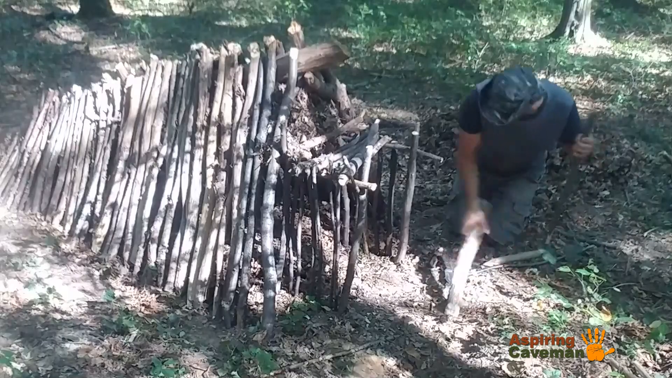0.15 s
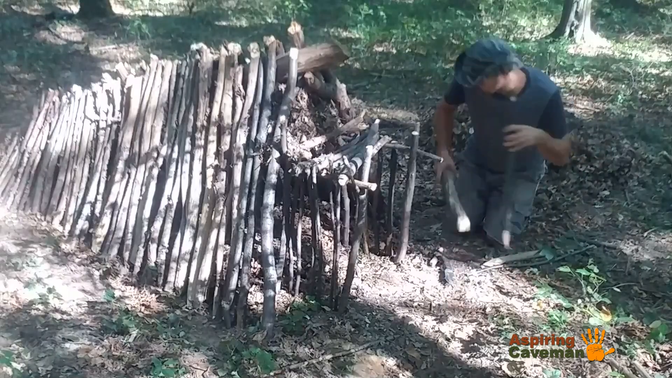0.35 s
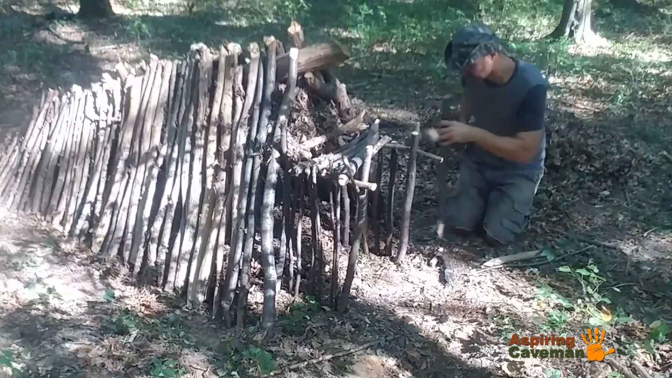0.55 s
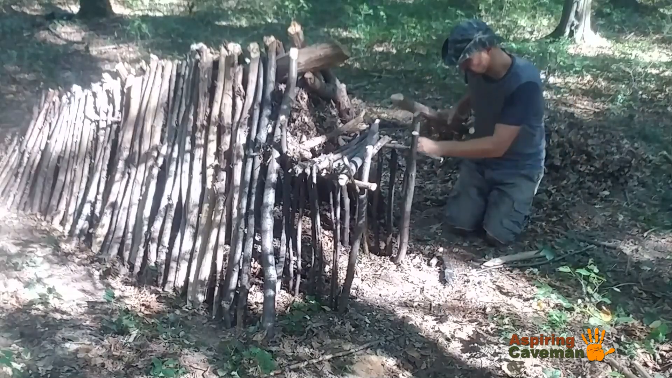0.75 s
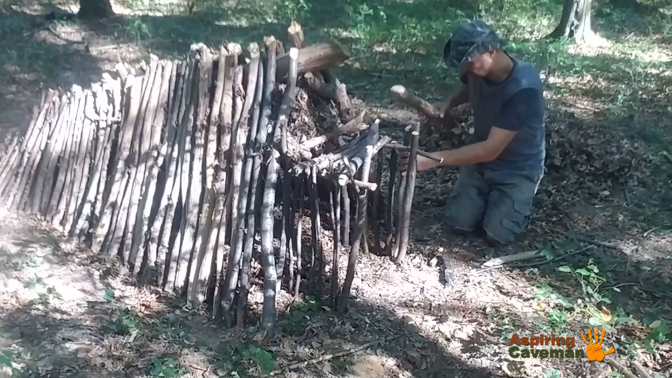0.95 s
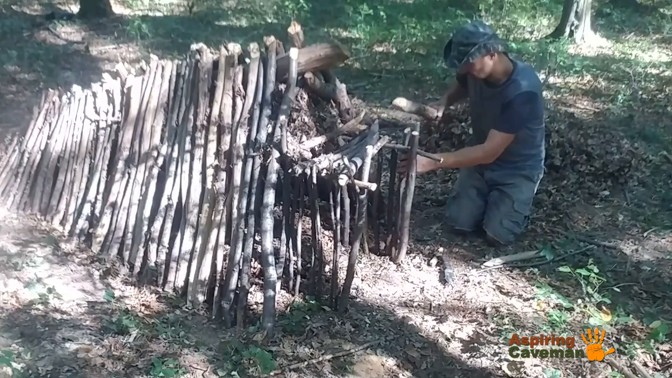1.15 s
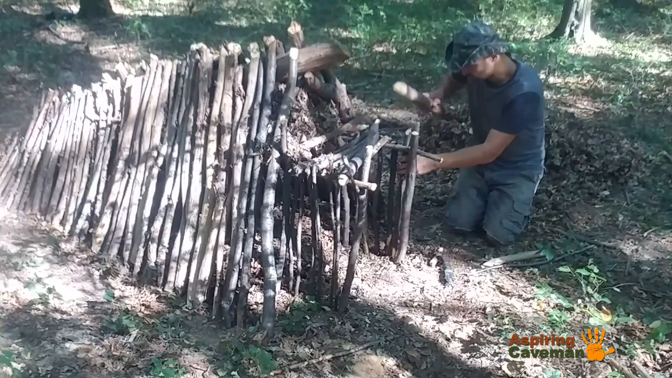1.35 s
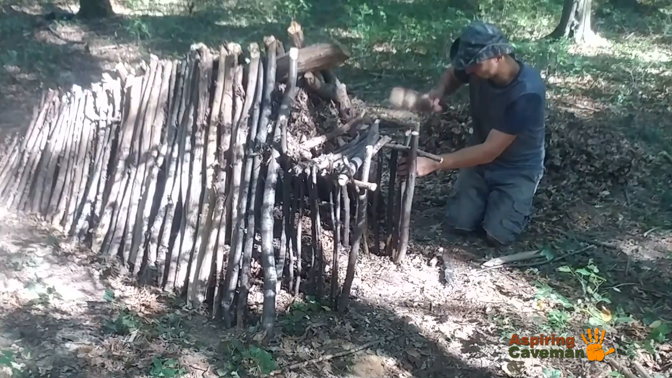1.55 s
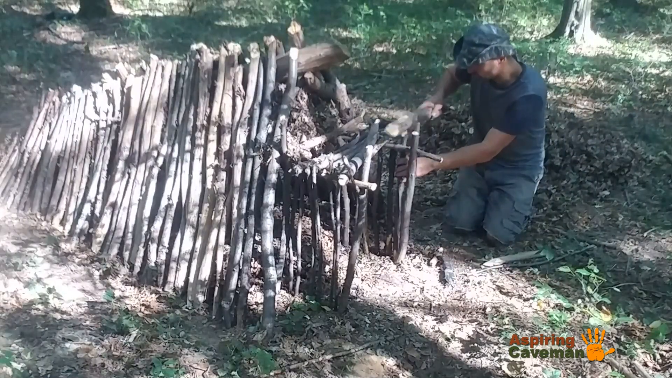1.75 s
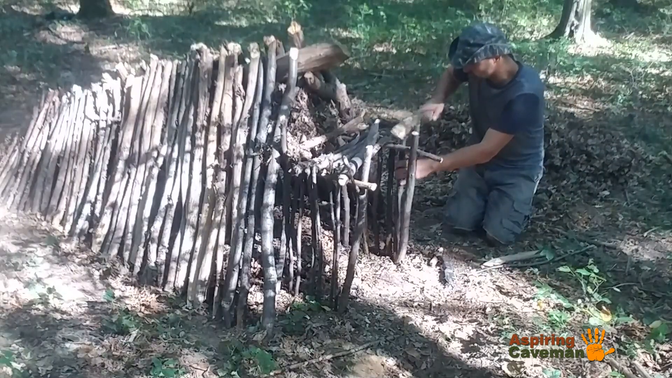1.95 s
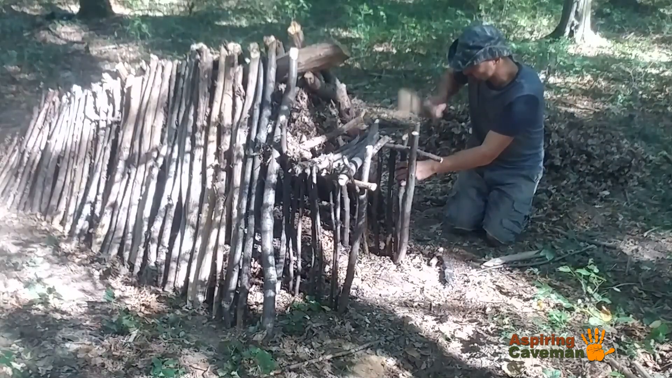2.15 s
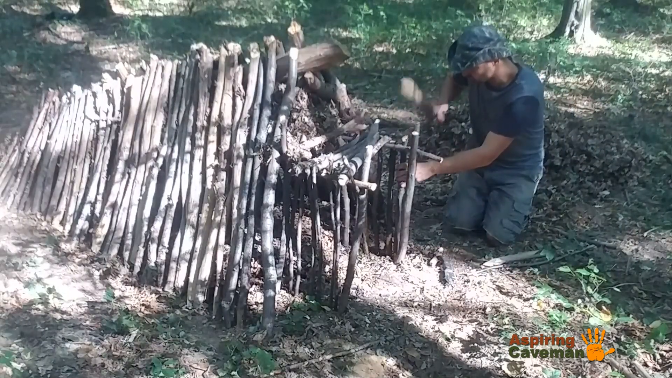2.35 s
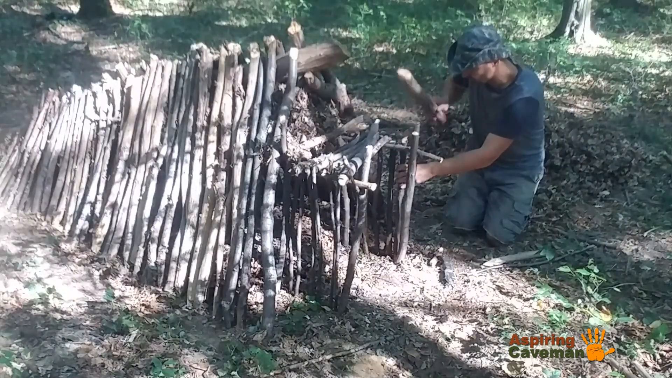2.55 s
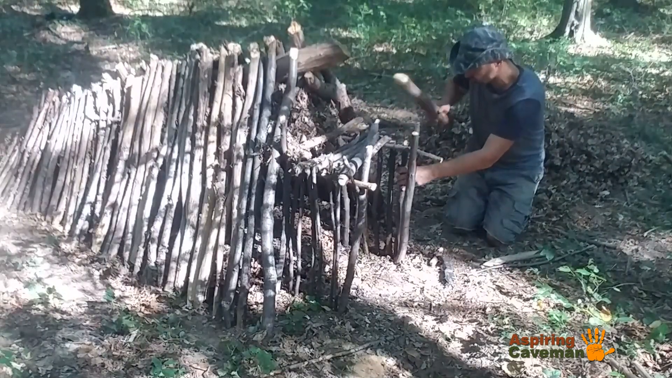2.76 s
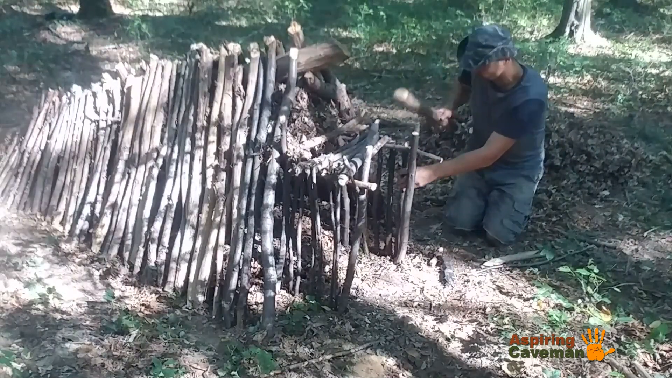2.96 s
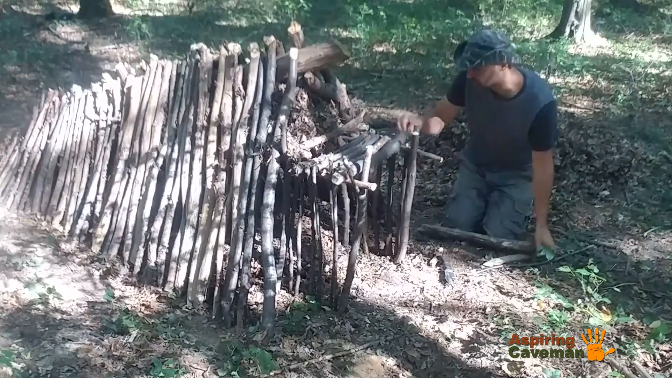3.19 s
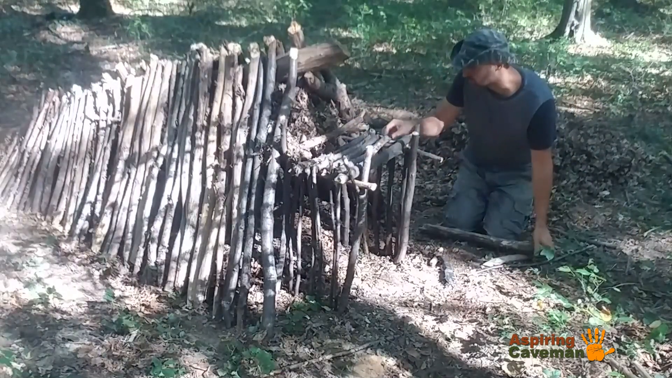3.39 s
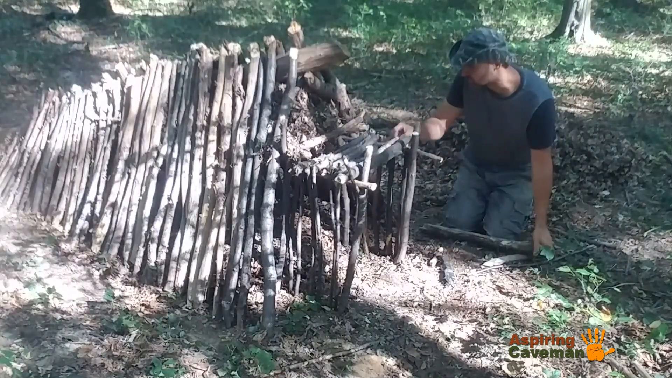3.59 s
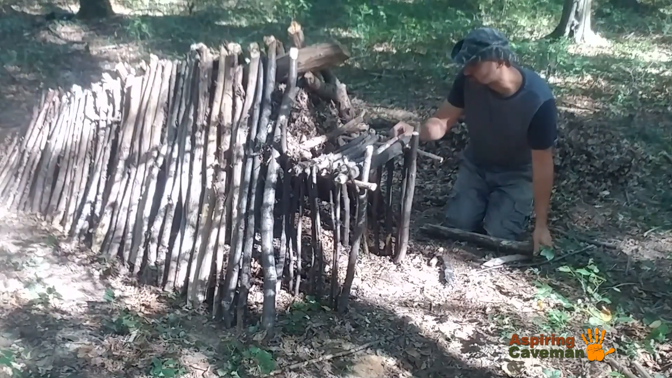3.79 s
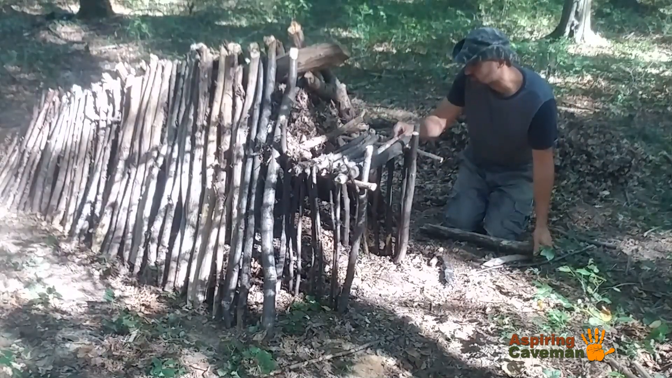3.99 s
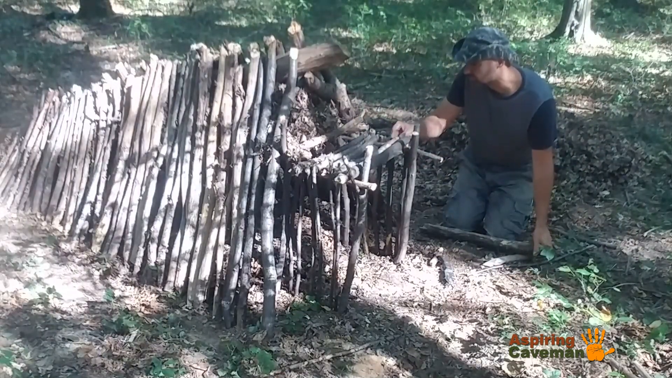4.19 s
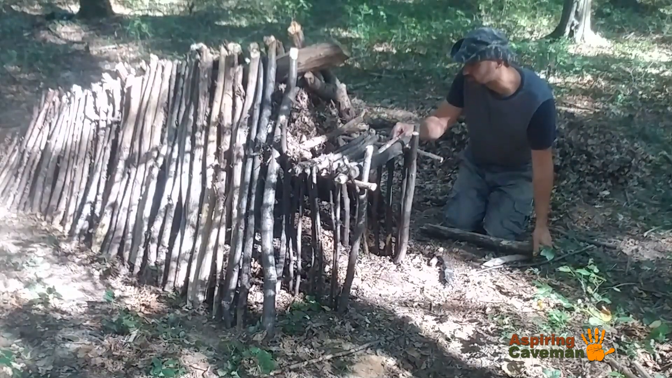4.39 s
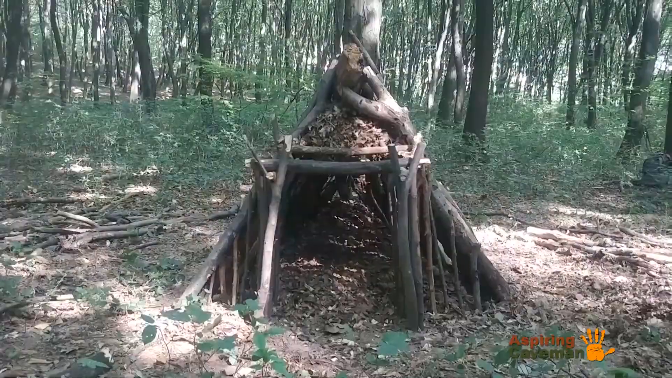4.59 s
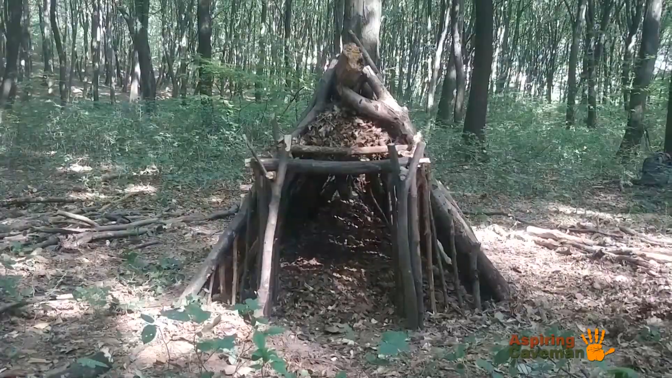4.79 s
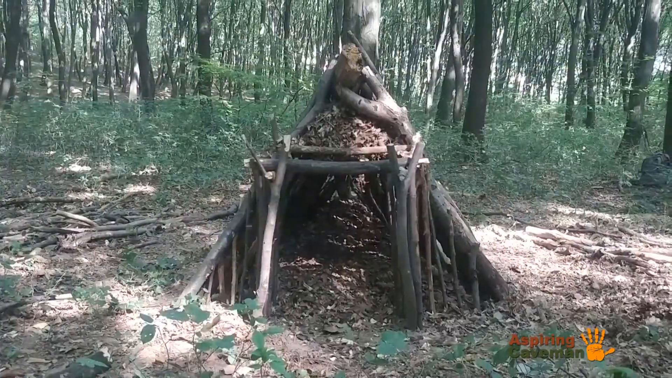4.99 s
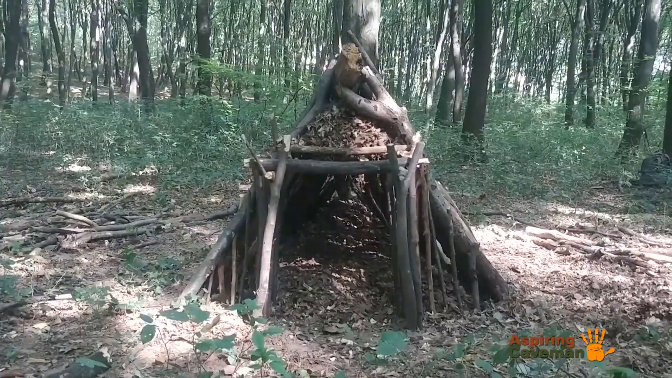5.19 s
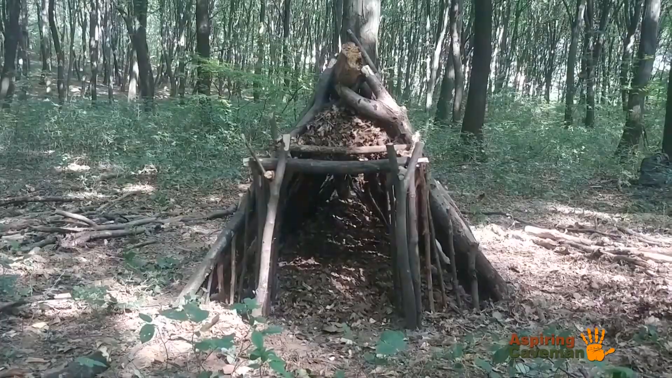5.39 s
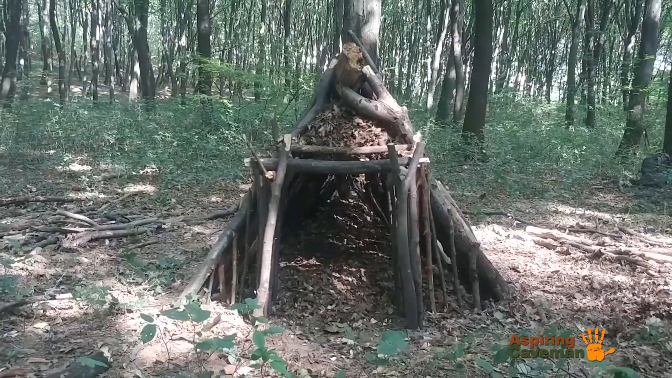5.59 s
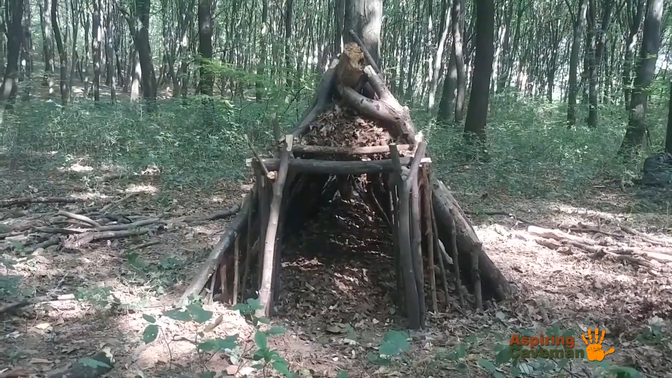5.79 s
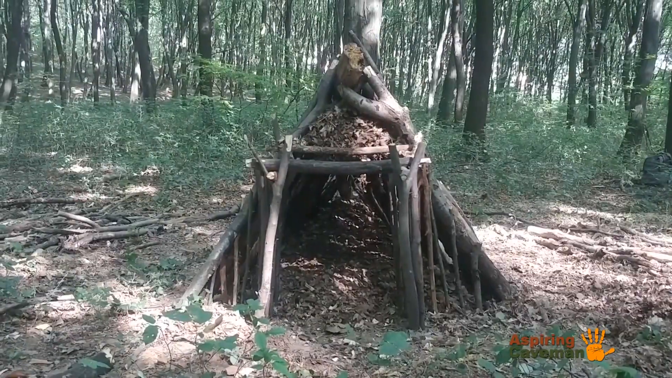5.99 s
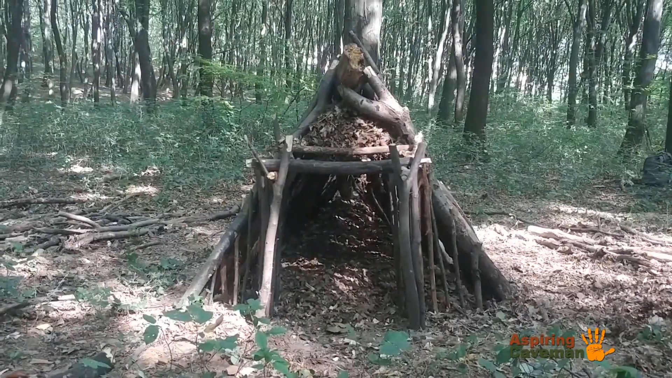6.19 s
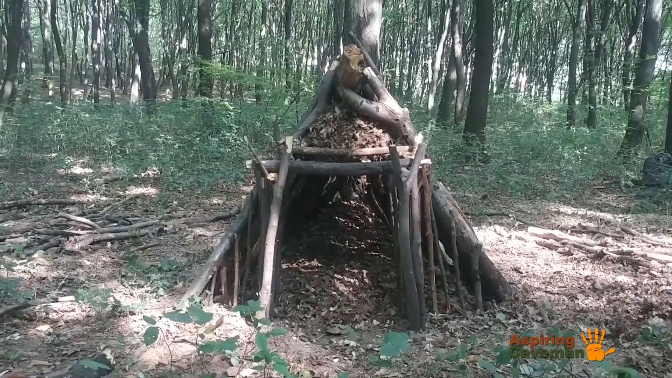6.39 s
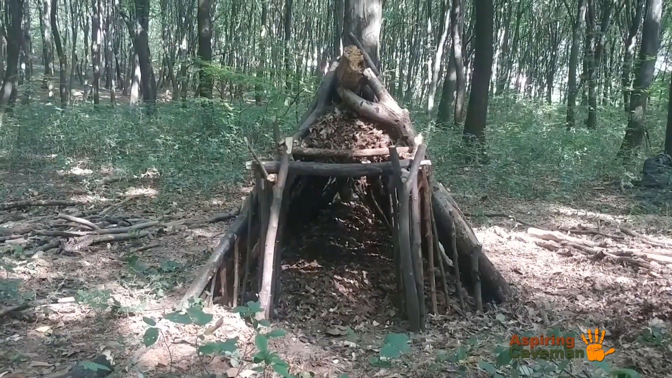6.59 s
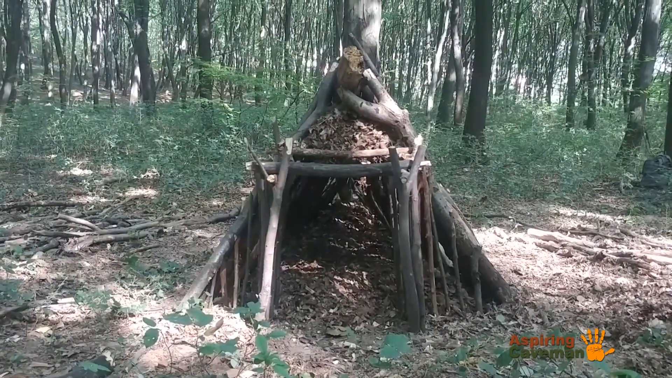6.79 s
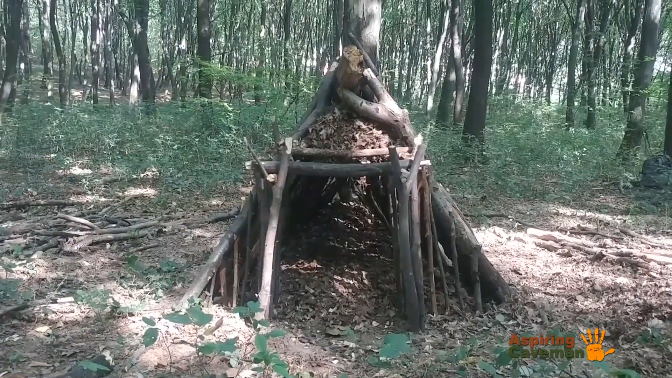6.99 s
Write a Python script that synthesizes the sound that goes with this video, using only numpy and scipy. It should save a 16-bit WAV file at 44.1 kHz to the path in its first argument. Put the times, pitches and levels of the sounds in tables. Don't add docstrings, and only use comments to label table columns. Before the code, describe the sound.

In an open forest, a short log taps a wooden stake seven times in quick, uneven blows, first very light, then firm, dry and clacking, with short echoes off trunks. Songbirds whistle, trill and chatter to the right over a faint road drone. The scene cuts; the road vanishes, wind buffets the small stereo camera microphone heavily, birds continue, and one sharper knock ends it.

```python
import sys
import numpy as np
from scipy import signal
from scipy.io import wavfile
from scipy.ndimage import uniform_filter1d

SR = 44100
rng = np.random.default_rng(int(sys.argv[2]) if len(sys.argv) > 2 else 0)


def ratio_of_db(decibels):
    return 10 ** (np.asarray(decibels, float) / 20)


def dump(signal):
    limited = np.clip(np.atleast_2d(signal).T, -1, 1)
    pcm = np.round(limited * 32767).astype(np.int16)
    wavfile.write(sys.argv[1], SR, pcm)


N = 310905
CHANGE_S = 4.586

# (start_s, thump_db, clack_centre_hz, crack_centre_hz)
BLOWS = [
    (1.598, -58, 3000, 6700),
    (1.846, -34.5, 2130, 6600),
    (2.0987, -44, 1500, 8300),
    (2.3285, -29.5, 2460, 6360),
    (2.5383, -29, 2870, 6300),
    (2.749, -29.5, 3080, 6200),
    (2.9672, -36.5, 3100, 5940),
    (7.035, -53, 4370, 6700),
]
# (start_s, knock_hz, knock_db, clack_db, crack_db)
TOUCHES = [(1.597, 700, -48, -43, -34), (1.8434, 570, -26.5, -36, -46), (1.8500, 800, -27, -44, -34.5),
           (2.0996, 574, -27.5, -35, -29), (2.1006, 700, -43, -40, -27.5), (2.1020, 830, -25, -39, -35),
           (2.321, 620, -57, -53, -49), (2.3245, 654, -28.5, -41, -43), (2.3285, 625, -40, -44, -40),
           (2.331, 1384, -31.5, -34, -53), (2.3345, 710, -32.5, -41, -60), (2.5335, 630, -27.5, -49, -46),
           (2.5385, 670, -27.5, -34.5, -39.5), (2.5420, 970, -30.5, -34, -49),
           (2.544, 1370, -32, -33.5, -44), (2.7484, 760, -16.5, -32, -37), (2.7520, 1610, -29, -24, -28),
           (2.7555, 810, -43, -40, -46), (2.9676, 770, -39, -30, -37), (2.9700, 705, -30.5, -35, -44),
           (2.9730, 800, -48, -41, -49), (2.984, 900, -54, -55, -46), (7.0361, 1090, -46, -24.5, -38)]
# (pitch_hz, level_db, time_to_fall_60_db_s)
CLACK_TONES = [(1440, -4, 0.0033), (2150, 11, 0.003), (2790, 11.5, 0.0032), (3500, 8.5, 0.0025)]
# (pitch_hz, level_db, time_to_fall_60_db_s)
CRACK_TONES = [(4700, 14, 0.0029), (5800, 7.5, 0.0045), (6600, -1.5, 0.011), (7550, 4, 0.0046)]


def log_blows():
    size = 2048
    out = np.zeros((2, N + size))
    t = np.arange(size) / SR
    chance = rng.standard_normal((len(TOUCHES), 8))
    give = 1 - np.exp(-(t / 0.00079) ** 2)
    bite = 1 - np.exp(-t / 0.00039)

    for start_s, thump_db, _, _ in BLOWS:
        thump = give * stake_thump(start_s, size)
        at = round(start_s * SR)
        out[:, at:at + size] += ratio_of_db(thump_db + 6.0) * thump

    for (start_s, knock_hz, knock_db, clack_db, crack_db), luck in zip(TOUCHES, chance):
        nearest_blow = min(BLOWS, key=lambda blow: abs(blow[0] - start_s))
        clack_hz, crack_hz = nearest_blow[2:]
        knock = ratio_of_db(knock_db + 2.5) * give * ring(knock_hz, 0.017, size)
        clack = ratio_of_db(clack_db - 2.5) * bite * struck_tones(CLACK_TONES, clack_hz, 32.0, luck, size)
        crack = ratio_of_db(crack_db + 1.5) * bite * struck_tones(CRACK_TONES, crack_hz, 46.0, luck[4:], size)
        side_db = np.array([[-0.62, 1.7, -32.0], [0.46, 5.2, 3.0]]) * (start_s < CHANGE_S)
        at = round(start_s * SR)
        out[:, at:at + size] += ratio_of_db(side_db) @ [knock, clack, crack]

    no_sparkle = signal.butter(6, 8800, fs=SR, output="sos")
    dull = signal.sosfilt(no_sparkle, out[:, :N])
    return trunk_echoes(from_right(dull, late_samples=3), t60=0.04, wet_db=-5.0, gap_s=0.0021)


def stake_thump(start_s, size):
    slack_hz, sink_s, t60_s = 83, 0.47, 0.023
    stake_hz = 300 - slack_hz * np.exp(-abs(start_s - BLOWS[1][0]) / sink_s)
    return ring(stake_hz, t60_s, size) + 0.45 * ring(0.6 * stake_hz, 2.3 * t60_s, size)


def struck_tones(table, centre_hz, focus_db, chance, length):
    out = 0
    for (hz, level_db, t60), luck in zip(table, chance):
        off_centre_db = focus_db * np.log2(hz / centre_hz) ** 2
        out = out + ratio_of_db(level_db - off_centre_db + 1.4 * luck) * ring(hz, t60, length)
    return out


def ring(hz, t60, length):
    t = np.arange(length) / SR
    return np.sin(2 * np.pi * hz * t) * ratio_of_db(-60 * t / t60)


def birds(song):
    out = np.zeros(N)
    trills_per_s = 66 * ratio_of_db(1.2 * drift(24.71)[0])
    strokes = np.cumsum(trills_per_s) / SR
    quaver = drift(185)
    for start_s, length, first_hz, last_hz, level_db, trill_hz in song:
        t = np.arange(int(length * SR)) / SR
        at = round(start_s * SR)
        now = slice(at, at + len(t))
        stroke = 2 * (strokes[now] % 1) - 1

        glide_hz = first_hz + (last_hz - first_hz) * t / length
        wide_hz = trill_hz + 0.21 * abs(last_hz - first_hz)
        pitch_hz = glide_hz + trill_hz * stroke + (24 + 0.357 * wide_hz) * quaver[0, now]

        fade = np.clip(np.minimum(t / 0.0035, (length - t) / 0.0037), 0, 1)
        snap = 1 + 0.78 * np.exp(-t / 0.0062)
        throb = (1 - np.clip(trill_hz / 400, 0, .8) * stroke ** 4) * ratio_of_db(2.6 * quaver[1, now])
        whistle = np.sin(2 * np.pi * np.cumsum(pitch_hz) / SR)
        out[now] += ratio_of_db(level_db - 3.5) * fade * snap * throb * whistle
    side_db = np.array([[-5.0], [3.0]])
    heard = from_right(out * ratio_of_db(side_db), late_samples=9)
    return trunk_echoes(heard, t60=.28, wet_db=-1.8, gap_s=.012)


BUZZ_HZ, CLEAR_HZ = 319, 111

# (start_in_phrase_s, length_s, first_hz, last_hz, level_db)
PHRASE_BUZZ = [(.255, .06, 5020, 4910, -58), (.335, 0.29, 4004, 4245, -55), (.6, 0.052, 4880, 2560, -53),
               (.69, 0.049, 2850, 4580, -54), (.81, 0.027, 3500, 4680, -49),
               (.915, .021, 6000, 6550, -53.5), (1.04, .061, 4550, 4950, -56),
               (1.085, .062, 3160, 2380, -55)]
# (start_in_phrase_s, length_s, first_hz, last_hz, level_db)
PHRASE_CLEAR = [(0, 0.0154, 5550, 4700, -55.5), (.015, .07, 5250, 5120, -62), (.17, .12, 5240, 5200, -65),
                (.49, 0.042, 5000, 5000, -56), (.72, 0.075, 3590, 3610, -54), (.855, 0.02, 3620, 3180, -57),
                (.877, .07, 4150, 4260, -55), (.955, 0.054, 4370, 2460, -54.5),
                (.99, 0.037, 4200, 4160, -51.5)]


def phrase(start_s):
    return notes(PHRASE_BUZZ, BUZZ_HZ, start_s) + notes(PHRASE_CLEAR, CLEAR_HZ, start_s)


# (start_s, length_s, first_hz, last_hz, level_db)
EARLY_BUZZ = [(.172, .02, 7800, 4440, -52.5), (.41, .22, 5260, 4990, -62), (.725, .31, 4010, 3990, -53.5),
              (.97, .057, 5940, 3500, -56), (1.05, .054, 3270, 4240, -60), (1.20, .029, 3290, 5800, -55),
              (1.255, .025, 5860, 3330, -53), (1.31, .025, 5130, 3430, -59),
              (1.405, .027, 4400, 2700, -51.5)]
# (start_s, length_s, first_hz, last_hz, level_db)
EARLY_CLEAR = [(.62, 0.086, 5200, 5050, -59.5), (.945, 0.096, 3660, 3650, -53),
               (1.12, 0.02, 4130, 3970, -51.5), (1.22, 0.061, 4280, 4000, -58),
               (1.48, .026, 3500, 4850, -57), (1.50, 0.036, 5200, 4900, -60),
               (1.53, 0.045, 4330, 2110, -58)]


def early_phrase():
    return notes(EARLY_BUZZ, BUZZ_HZ) + notes(EARLY_CLEAR, CLEAR_HZ)


# (start_s, length_s, first_hz, last_hz, level_db)
FLUTE = [(.54, .025, 2320, 2280, -55), (.565, 0.018, 2070, 2150, -51), (.71, 0.088, 2620, 2570, -46.5),
         (.84, 0.046, 2750, 2900, -57), (6.015, 0.077, 1926, 1740, -57.5), (6.145, 0.039, 2470, 2260, -51),
         (6.325, 0.036, 1814, 2060, -55), (6.40, 0.073, 2235, 2150, -53.5), (6.575, 0.022, 1745, 1790, -54),
         (6.625, 0.052, 2665, 2400, -53), (6.74, 0.044, 2560, 2650, -62)]
# (start_s, level_db)
CHURRS = [(.195, -57.5), (1.865, -61.5), (2.90, -56), (3.69, -55.5), (4.965, -56), (6.925, -64.5)]
# (start_s, pitch_hz, level_db)
PIPS = [(.375, 4200, -62), (.87, 7050, -65), (2.13, 4180, -55.5), (2.235, 4210, -58), (3.10, 4190, -55.5),
        (3.21, 4170, -60), (3.385, 5150, -57.5), (4.640, 5100, -61), (4.675, 5260, -60.5),
        (6.815, 4660, -60.5)]


def calls():
    churr_s, churr_hz, rise_hz, churr_trill_hz = 0.069, 3495, 147, 190
    pip_s, pip_trill_hz = 0.025, 60
    flute = notes(FLUTE, trill_hz=55)
    churrs = [(s, churr_s, churr_hz, churr_hz + rise_hz, db, churr_trill_hz) for s, db in CHURRS]
    pips = [(s, pip_s, hz, hz, db, pip_trill_hz) for s, hz, db in PIPS]
    return flute + churrs + pips


def notes(table, trill_hz, start_s=0):
    return [(start_s + s, length, first_hz, last_hz, db, trill_hz) for s, length, first_hz, last_hz, db in table]


# (first_s, last_s, low_hz, high_hz, level_db, chirps_per_s)
CHATTER_BEFORE = [
    (.96, 1.36, 2930, 5800, -60, 127),
    (1.40, 1.56, 2840, 5250, -60, 57),
    (4.28, 4.59, 2710, 5490, -54.5, 74),
]
# (first_s, last_s, low_hz, high_hz, level_db, chirps_per_s)
CHATTER_AFTER = [
    (5.56, 5.98, 2536, 5500, -59.5, 92),
    (5.99, 6.13, 2400, 5600, -69, 80),
]


def chatter(spells):
    rows = []
    for first_s, last_s, low_hz, high_hz, level_db, per_s in spells:
        when, where, slope, size = rng.random((60, 4)).T
        count = int(np.clip(per_s * (last_s - first_s), 1, 60))
        start_s = first_s + (last_s - first_s) * when
        length_s = 0.0086 + 0.0108 * size
        middle_hz = low_hz * (high_hz / low_hz) ** where
        swing_hz = 700 * (2 * slope - 1)
        chirp_db = level_db + 6 * (size - .5) - 8 * (2 * where - 1) ** 2
        no_trill = 0 * when
        chirps = zip(start_s, length_s, middle_hz - swing_hz, middle_hz + swing_hz, chirp_db, no_trill)
        rows += list(chirps)[:count]
    return rows


# (pitch_hz, level_db per Hz)
WIND_TONE = [(10, 0.5), (21, -2.5), (34, -11.5), (50, -17), (70, -22), (104, -24.5), (160, -48), (260, -46)]
# (time_s, level_db)
BREEZE = [(0, -42), (.5, -51.5), (1.2, -45), (1.45, -48), (2.2, -52.5), (2.8, -41.5), (3.3, -36.5),
          (3.9, -44.5), (4.65, -47), (5.1, -29.5), (5.5, -33), (6.0, -38), (6.4, -47), (7.05, -42)]
# (peak_s, peak_db, left_right_db)
EDDIES = [(.27, -48, 8), (.70, -42, -3), (1.31, -58, 4), (1.70, -38.5, 4), (1.86, -29, -3), (2.08, -40, 3),
          (2.41, -36.5, 9), (2.71, -42, 5), (3.02, -29.5, 3), (3.419, -28, -1), (3.55, -28.5, -3.5),
          (3.73, -38.5, 15), (4.28, -32, -2), (4.379, -27.5, -3.5), (4.48, -32.5, 4), (4.869, -26.5, 6),
          (5.04, -46, 2), (5.15, -28, -2), (5.261, -17, 3), (5.34, -27.5, -11), (5.46, -15.5, 4),
          (5.64, -24.5, 7), (5.74, -22.5, 0), (5.87, -29.5, 9), (5.99, -28.5, -12.5), (6.28, -31.5, -4),
          (6.79, -42, 0), (7.04, -44, 11)]


def wind():
    rise_s, fall_s = 0.058, 0.06
    t = np.arange(0, N + 64, 64) / SR
    power = ratio_of_db(2 * np.interp(t, *np.transpose(BREEZE))) * np.ones((2, 1))
    for peak_s, peak_db, pan_db in EDDIES:
        away = np.where(t < peak_s, (peak_s - t) / rise_s, (t - peak_s) / fall_s)
        side_db = np.array([[1], [-1]]) * pan_db
        power = power + ratio_of_db(2 * peak_db + side_db) * np.exp(-2 * away)
    gust_db = np.array([np.interp(np.arange(N) / SR, t, 10 * np.log10(p)) for p in power])

    out = 0
    for hz, band in noise_bands(WIND_TONE, patchy_db=2.7):
        out = out + band * ratio_of_db(0.0032 * (gust_db + 10) * np.log2(hz / 30))
    out = rms_one(out)
    swell = uniform_filter1d(out ** 2, size=3000, axis=1)
    evened = rms_one(out / (swell + .1) ** .4)
    push = evened * ratio_of_db(gust_db + 2.5)
    return .42 * np.tanh(push / .42)


# (pitch_hz, level_db per Hz)
ROAD_TONE = [(240, -58), (400, -5), (472, -9), (932, 1.5), (1280, -2.5), (2600, -23), (3380, -62),
             (5720, -120)]
# (peak_s, peak_db, half_width_s)
PASSES = [
    (.12, -53, 0.26),
    (1.08, -49.5, 0.18),
    (1.9, -58, 0.27),
    (3.2, -51, 0.24),
    (4.08, -55.5, 0.45),
    (4.53, -54.5, 0.097),
]


def road():
    t = np.arange(N) / SR
    power = ratio_of_db(2 * -61)
    for peak_s, peak_db, half_s in PASSES:
        power = power + ratio_of_db(2 * peak_db) / (1 + ((t - peak_s) / half_s) ** 2)
    drone_db = 10 * np.log10(power)
    tilt_db = 0.8944 * (drone_db + 50)
    out = 0
    for hz, band in noise_bands(ROAD_TONE, patchy_db=1.5):
        out = out + band * ratio_of_db(tilt_db * np.log2(hz / 1000))
    return rms_one(out) * ratio_of_db(drone_db + 5.5)


# (pitch_hz, level_db per Hz)
AIR_TONE = [(24, -37), (40, -1.5), (118, -12), (262, -12), (433, -22.5), (585, -30), (715, -19), (790, -28),
            (1480, -33.5), (2380, -35.5), (5870, -37.5), (13800, -41), (16000, -47)]
# (pitch_hz, left_right_db)
AIR_BALANCE = [(60, 0), (300, -3), (800, -0.8), (4000, -1.5), (15000, -0.8)]
# (time_s, level_db)
MURMUR = [(0, -51.5), (2.2, -53), (2.6, -52.5), (4.15, -50.5), (4.85, -57.5), (5.8, -51), (7.05, -51.5)]


def air():
    swell_db = np.interp(np.arange(N) / SR, *np.transpose(MURMUR)) + 57
    out = 0
    for hz, band in noise_bands(AIR_TONE, patchy_db=1.88):
        side_db = np.array([[.5], [-.5]]) * at_hz(AIR_BALANCE, hz)
        out = out + band * ratio_of_db(side_db + swell_db / (1 + (hz / 700) ** 2))
    low = signal.lfilter([.03], [1, -.97], out)
    shared = out + 0.1 * low[::-1]
    stir_db = 0.92 * drift(36.0)[0]
    return rms_one(shared) * ratio_of_db(-48 + 3.5 + stir_db)


def trunk_echoes(x, t60, wet_db, gap_s):
    t = np.arange(int(.6 * SR)) / SR
    cloud = rng.standard_normal((2, len(t))) * ratio_of_db(-60 * t / t60) * np.clip(t / gap_s, 0, 1)
    cloud = ratio_of_db(wet_db) * cloud / np.sqrt(np.sum(cloud ** 2, axis=1)[:, None])
    cloud[:, 0] = 1
    return signal.fftconvolve(x, cloud, axes=1)[:, :N]


def from_right(x, late_samples):
    return np.array([np.roll(x[0], late_samples), x[1]])


def noise_bands(spectrum, patchy_db):
    low, high = spectrum[0][0], min(spectrum[-1][0], .45 * SR)
    edges = np.geomspace(low, high, int(2 * np.log2(high / low)) + 2)
    white = rng.standard_normal((2, 2, N))
    for k, (lo, hi) in enumerate(zip(edges, edges[1:])):
        middle_hz = np.sqrt(lo * hi)
        band_filter = signal.butter(2, [lo, hi], "band", fs=SR, output="sos")
        band = signal.sosfilt(band_filter, white[k % 2])
        flicker_db = patchy_db * drift(8.5) / (1 + lo / 5000)
        yield middle_hz, band * ratio_of_db(at_hz(spectrum, middle_hz) + flicker_db)


def at_hz(points, hz):
    pitch_hz, level_db = np.array(points).T
    return np.interp(np.log(hz), np.log(pitch_hz), level_db)


def drift(rate):
    r = np.exp(-128 * np.pi * rate / SR)
    steps = rng.standard_normal((2, N // 64 + 1002))
    slow = signal.lfilter([1], [1, -2 * r, r * r], steps)[:, 1000:]
    return np.array([np.interp(np.arange(N) / 64, np.arange(len(v)), rms_one(v)) for v in slow])


def rms_one(x):
    return x / np.sqrt(np.mean(x ** 2) + 1e-20)


def scene():
    first_view = np.clip((CHANGE_S - np.arange(N) / SR) / 0.003, 0, 1)
    single = calls()
    calls_before = [row for row in single if row[0] < CHANGE_S]
    calls_after = [row for row in single if row[0] > CHANGE_S]
    song_before = early_phrase() + phrase(3.686) + chatter(CHATTER_BEFORE) + calls_before
    song_after = phrase(4.960) + chatter(CHATTER_AFTER) + calls_after
    before = birds(song_before) + road()
    return log_blows() + first_view * before + birds(song_after) + wind() + air()


def band_limit(x):
    return signal.sosfilt(signal.butter(12, 16440, fs=SR, output="sos"), x)


def record(dry):
    top_cut = signal.ellip(14, .2, 80, 15740, fs=SR, output="sos")
    mix = signal.sosfilt(top_cut, dry)
    return band_limit(mix)


dry = scene()
out = record(dry)
dump(out)
```